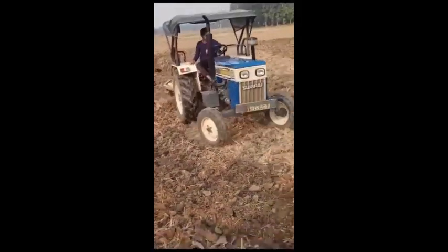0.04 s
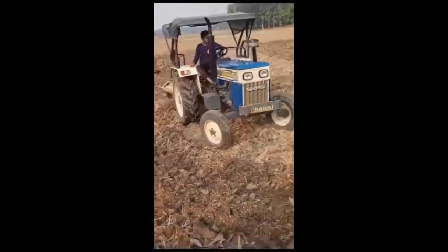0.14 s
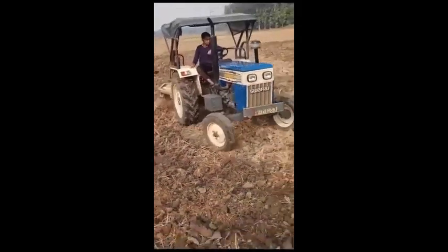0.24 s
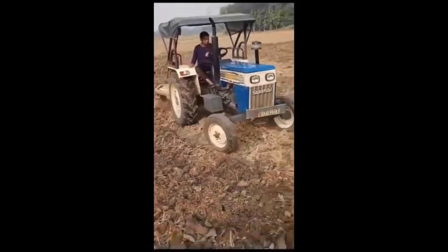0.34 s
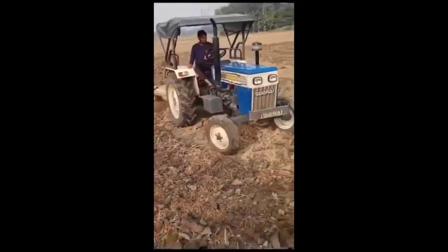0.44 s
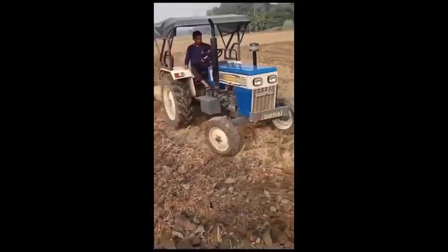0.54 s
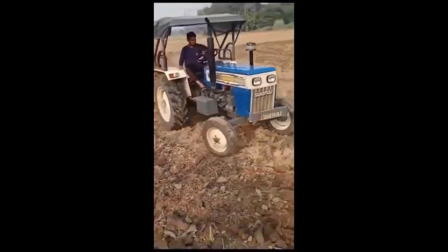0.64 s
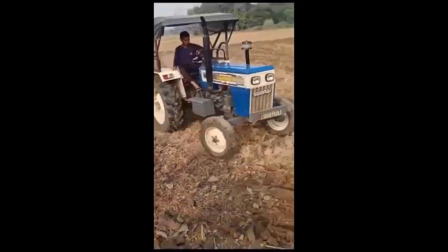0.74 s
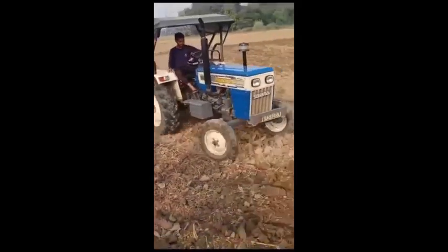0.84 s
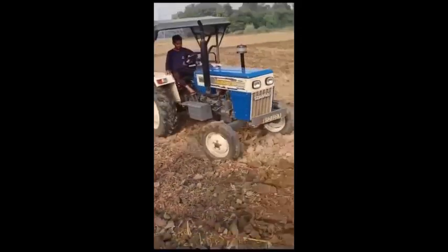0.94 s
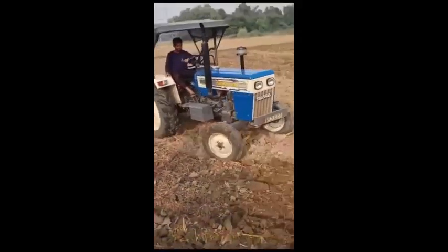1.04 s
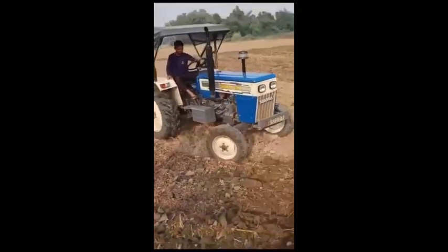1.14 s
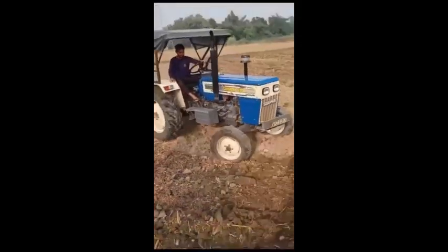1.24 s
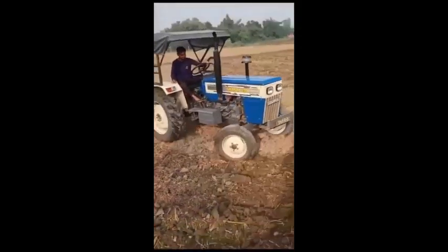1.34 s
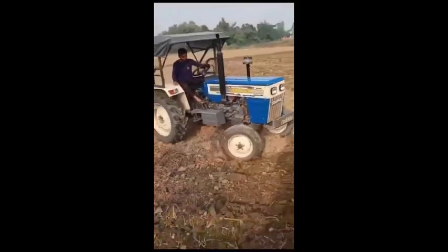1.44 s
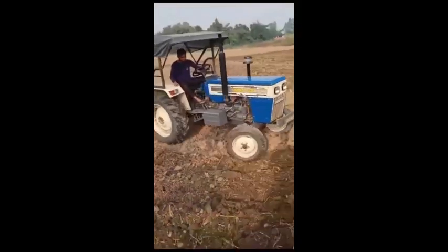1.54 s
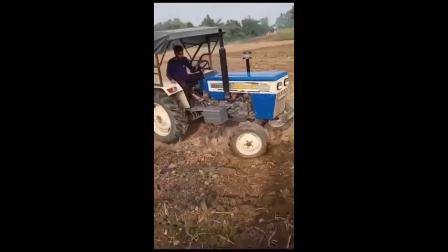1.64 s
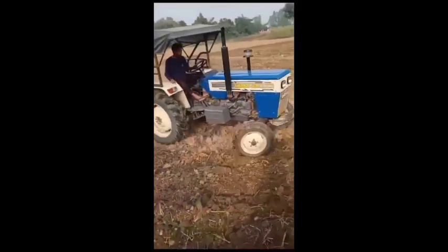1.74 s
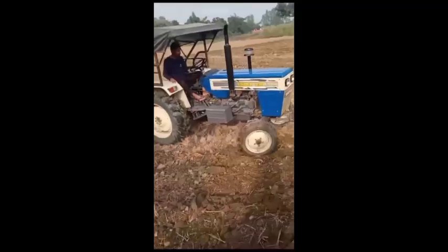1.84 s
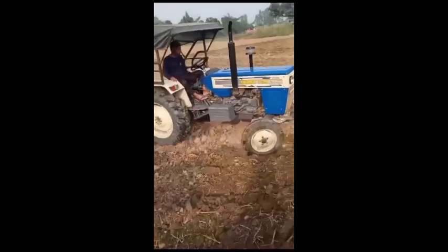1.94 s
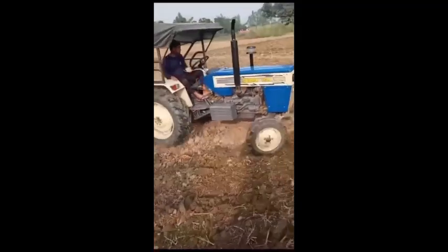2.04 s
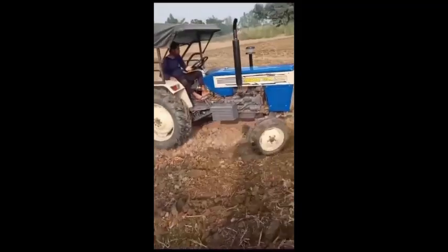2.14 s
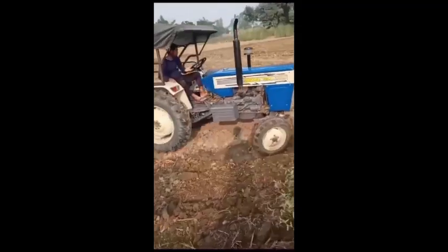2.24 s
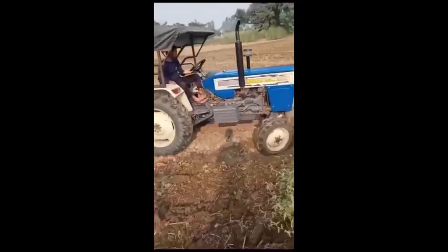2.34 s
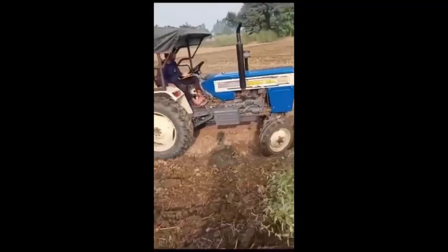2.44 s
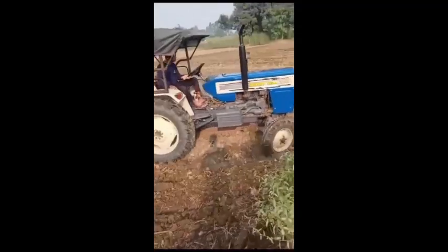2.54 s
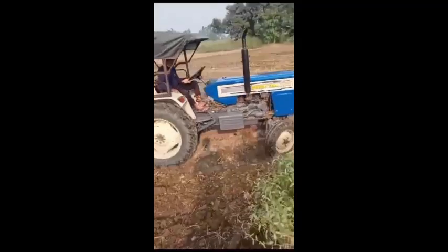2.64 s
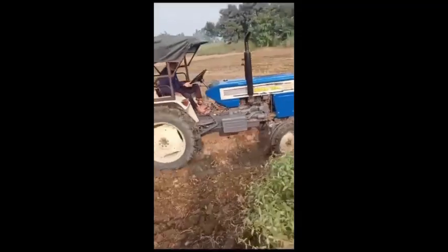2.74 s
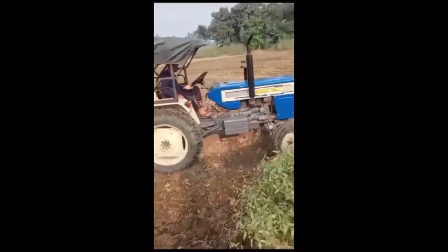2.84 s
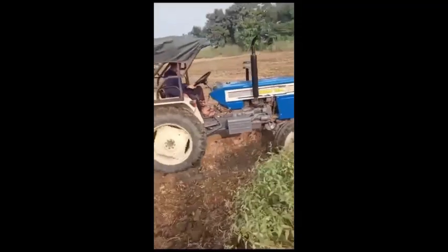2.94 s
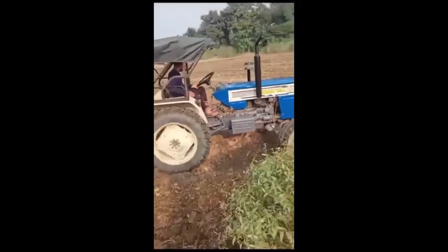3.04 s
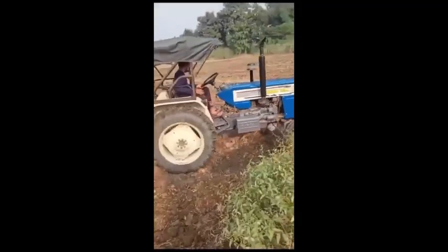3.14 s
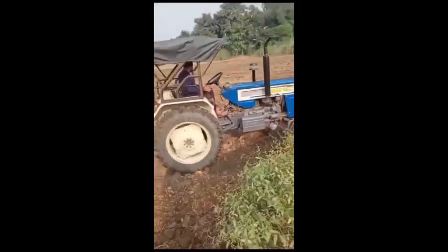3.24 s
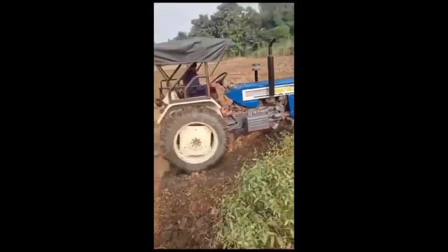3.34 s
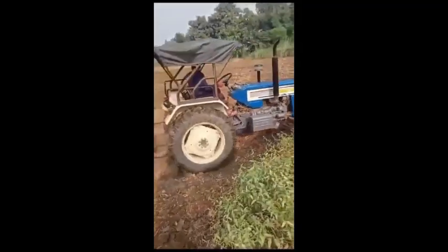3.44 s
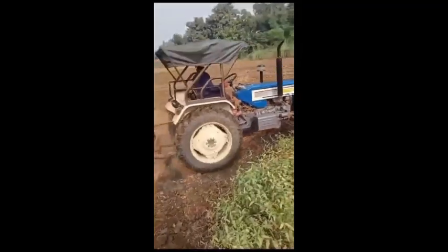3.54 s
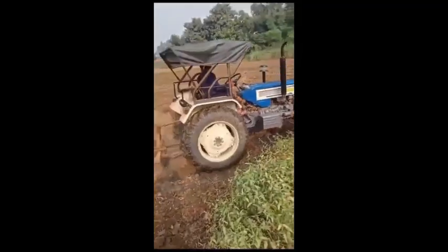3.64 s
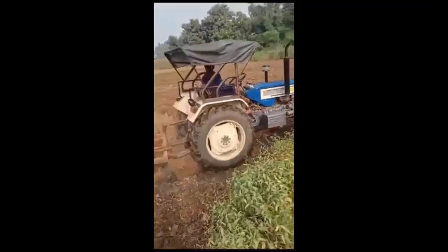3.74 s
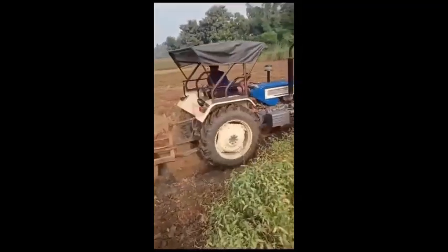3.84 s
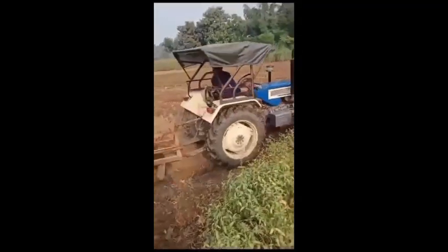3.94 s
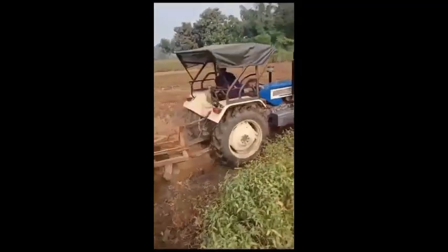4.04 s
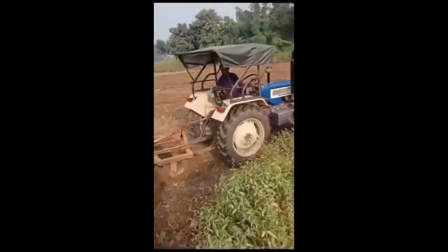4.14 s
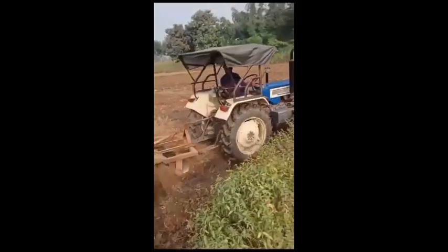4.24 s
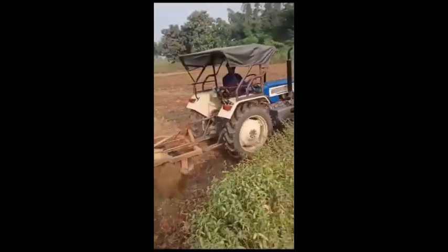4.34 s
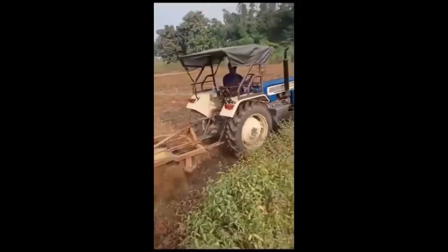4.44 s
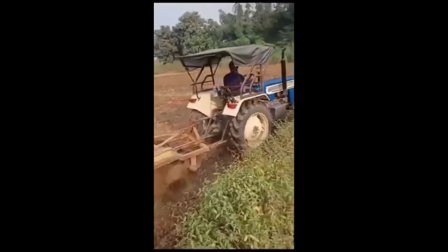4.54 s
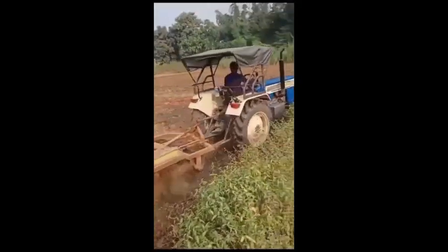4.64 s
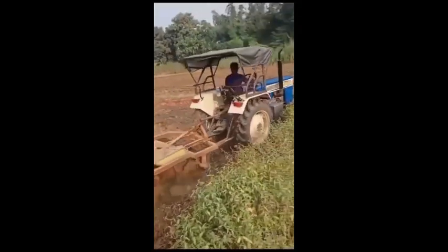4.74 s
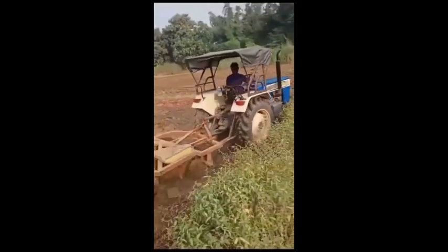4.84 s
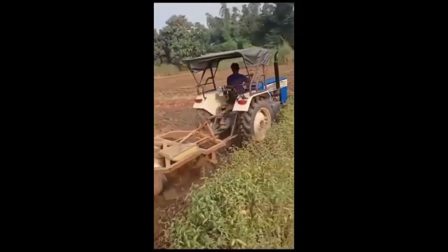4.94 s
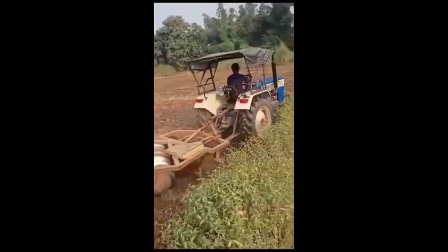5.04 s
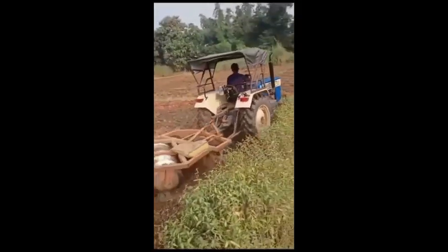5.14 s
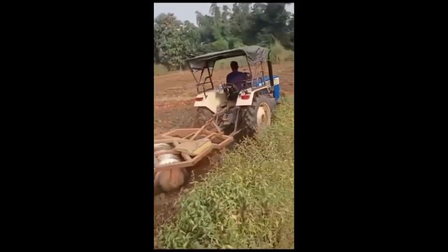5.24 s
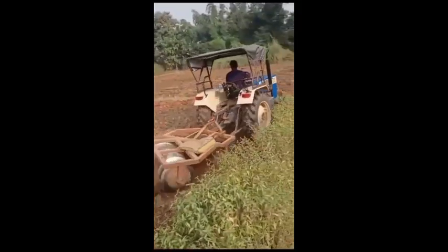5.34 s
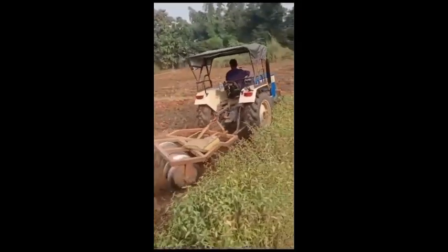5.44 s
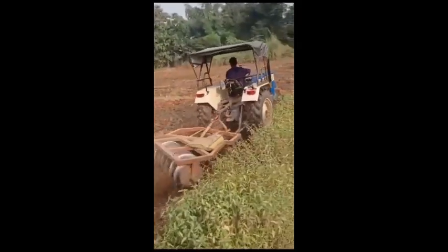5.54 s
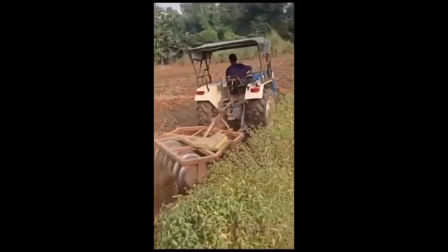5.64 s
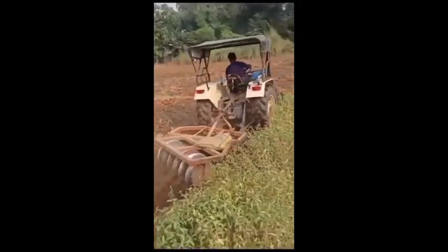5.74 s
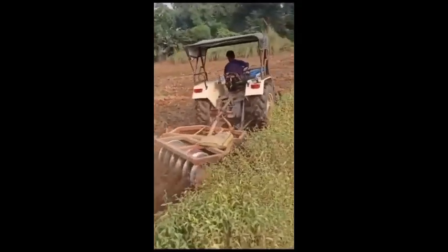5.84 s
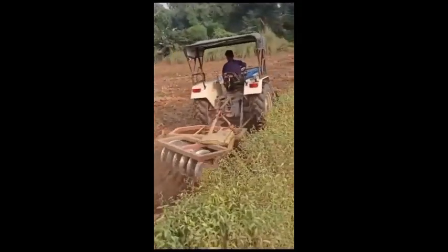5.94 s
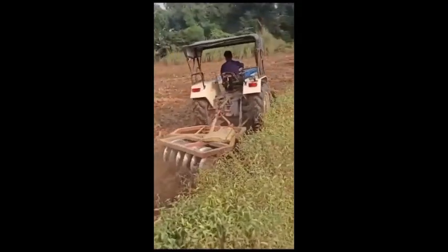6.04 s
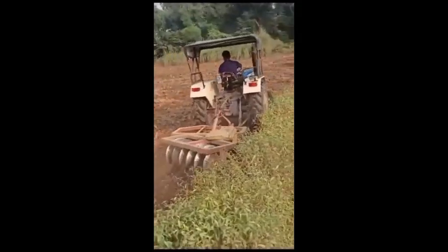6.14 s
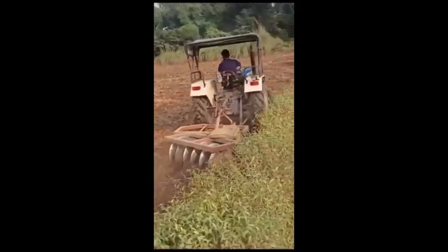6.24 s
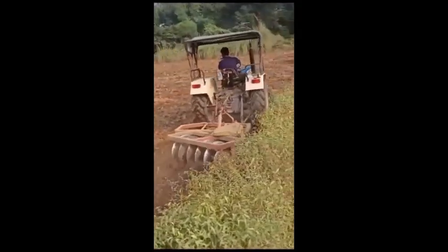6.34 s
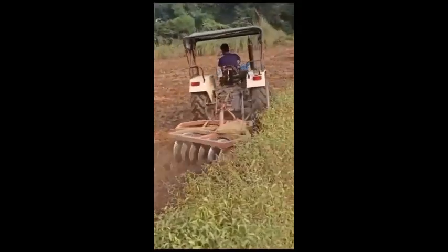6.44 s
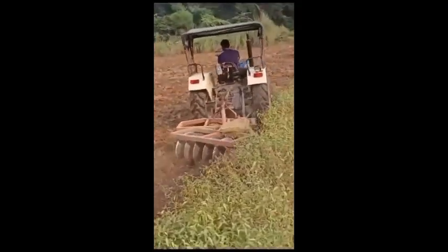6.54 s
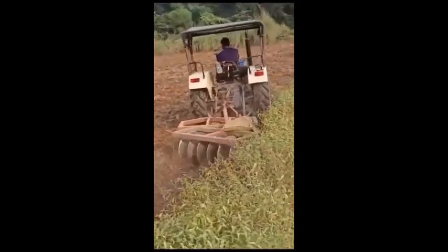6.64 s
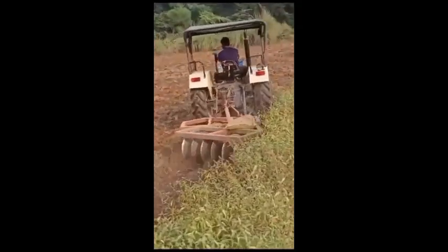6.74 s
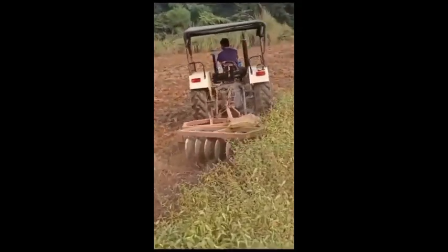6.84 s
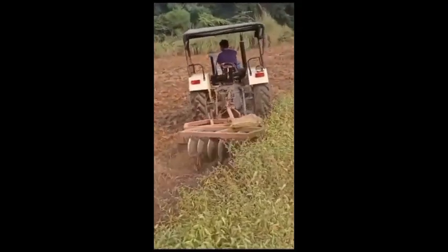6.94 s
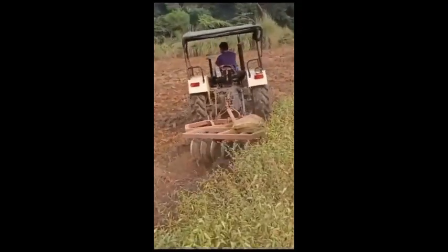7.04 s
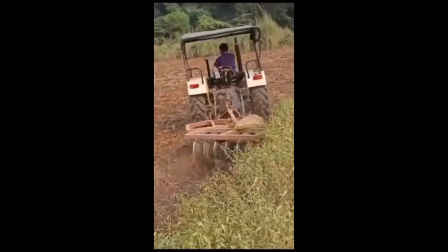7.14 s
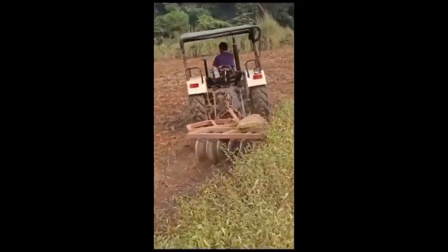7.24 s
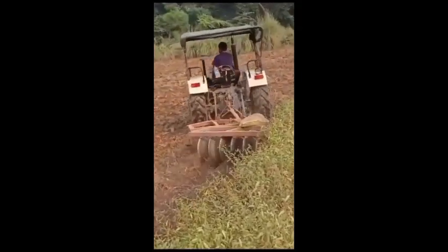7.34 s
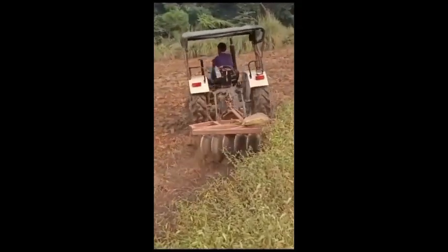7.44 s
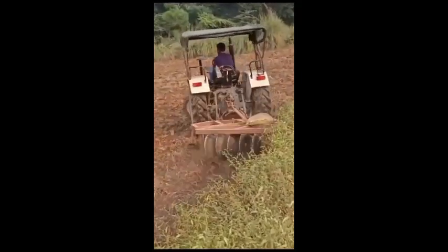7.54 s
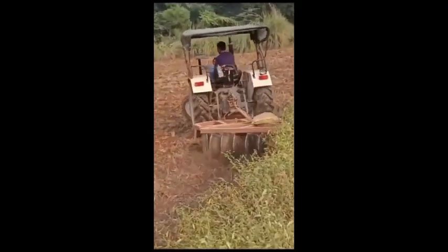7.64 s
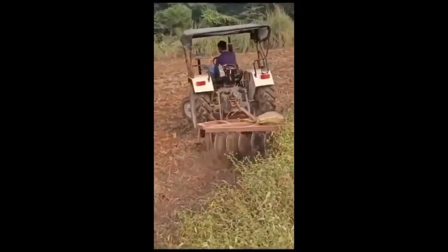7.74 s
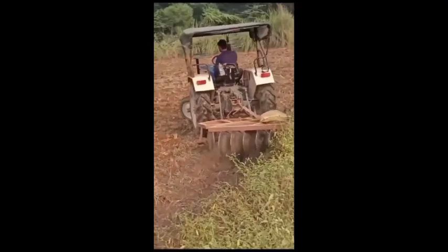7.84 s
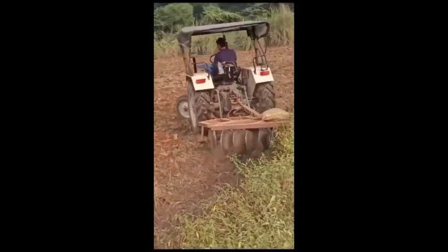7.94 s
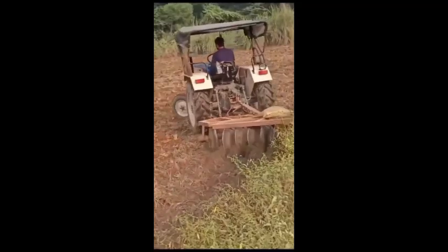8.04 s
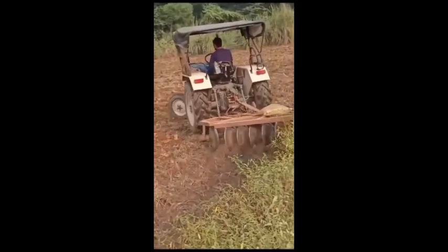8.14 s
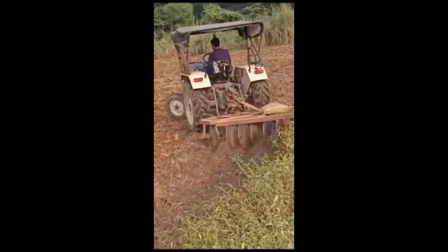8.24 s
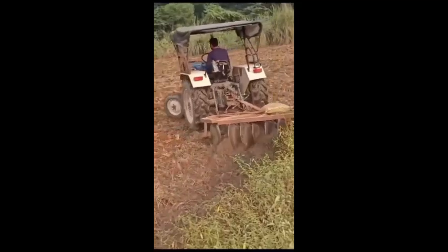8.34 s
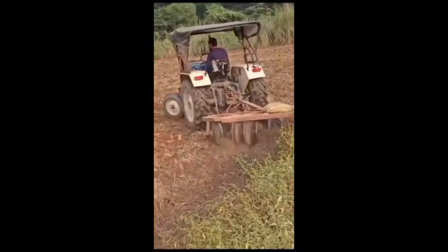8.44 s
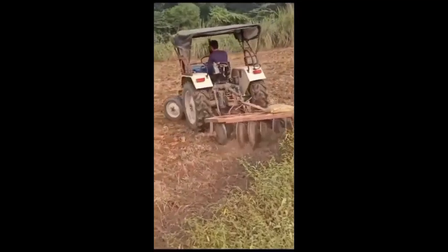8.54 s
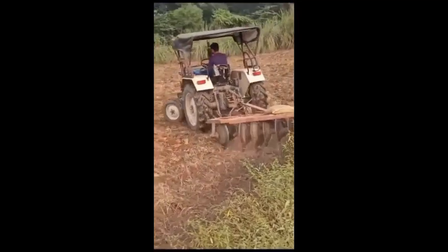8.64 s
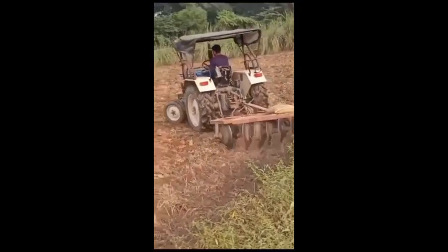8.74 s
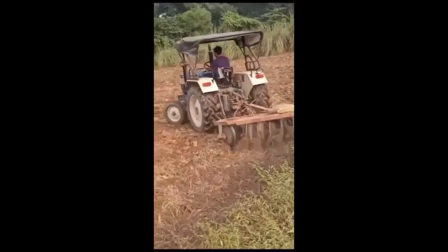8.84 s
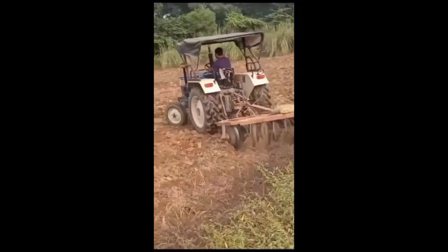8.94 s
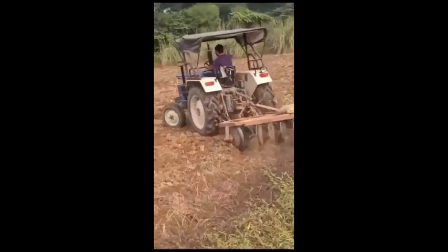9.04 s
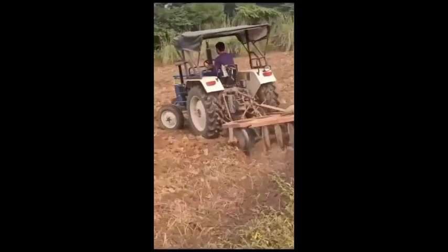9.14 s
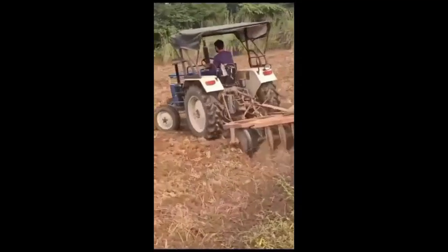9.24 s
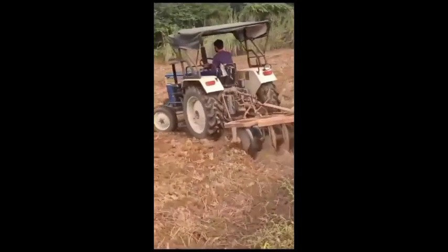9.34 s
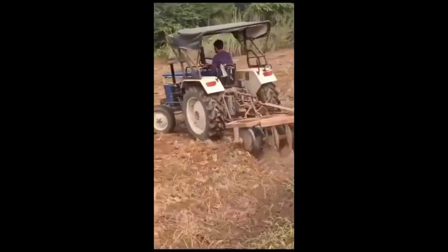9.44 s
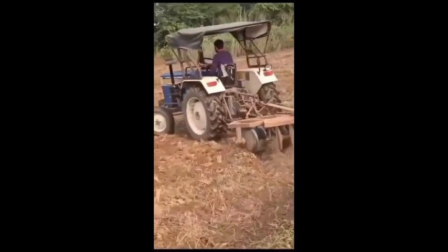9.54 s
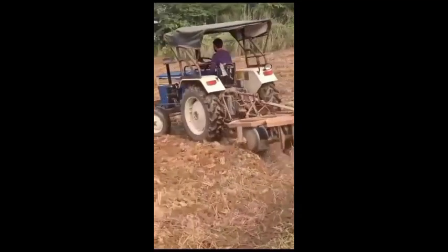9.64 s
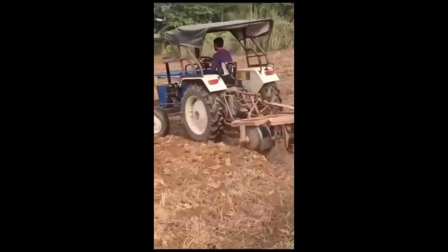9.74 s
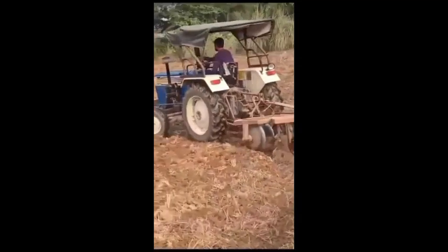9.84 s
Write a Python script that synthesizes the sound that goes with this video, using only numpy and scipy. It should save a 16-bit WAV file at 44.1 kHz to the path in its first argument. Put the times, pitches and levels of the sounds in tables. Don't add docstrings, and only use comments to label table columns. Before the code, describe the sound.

A tractor works in a dry open field, heard dry and close on a phone. From 0 s its diesel runs at a nearly constant speed, about thirty-five firings a second: a hard, barking throb with low thumps, pipe-like ringing from the exhaust, bright knocking and rattling tin. Around 2 to 3 s it turns side-on; a brief bonnet boom colours the note, which then becomes hollower and less raspy. Short, crisp clods clink on the harrow discs at about 2.1, 2.6, 3.6, 4.0, 4.9, 5.1 and 5.5 s. From 5 s the tail faces the microphone, knocks and hiss fall away, and a duller, low beat remains, still with occasional harder barks. A loose panel sings thin and high in wavering snatches from about 6 s. Fainter clinks follow, soil trickles near 7.5 s and faintly after 9 s, as the engine gradually recedes without stopping.

```python
import sys
import numpy as np
from scipy import signal
from scipy.fft import rfft, irfft, next_fast_len
from scipy.io import wavfile
from scipy.ndimage import map_coordinates

SR = 44100
rng = np.random.default_rng(int(sys.argv[2]) if len(sys.argv) > 2 else 0)


def ratio(d):
    e = np.asarray(d, float) / 20
    return 10 ** e


def wav_out(sig):
    wavfile.write(sys.argv[1], SR, np.round(np.clip(np.atleast_2d(sig).T, -1, 1) * 32767).astype(np.int16))


N = 435708

# time_s, side_on (0-1), tail_on (0-1), ground_echo_delay_ms, bonnet_boom_db
POSE = [
    (0, 0, 0.04, 0.72, -45),
    (1.8, 0.12, 0.03, 0.73, -41.5),
    (2.1, 0.2, 0.11, 0.83, -32),
    (2.6, 0.5, 0.31, 1, -32),
    (3, 0.8, .2, 1.035, -40),
    (3.5, 1, 0.5, 1.26, -36.5),
    (4.3, 1, 0.98, 1.35, -41),
    (5.3, .7, 0.95, 1.48, -47),
    (6, 0.28, 0.99, 1.45, -58),
    (9.88, 0.13, 0.98, 1.52, -55),
]


def unit(x):
    return x / np.sqrt(np.mean(x ** 2) + 1e-20)


def curves(rows):
    s, *cols = np.transpose(rows)
    return [np.interp(np.arange(N) / SR, s, c) for c in cols]


def wobble(rate):
    coarse = np.arange(0, N + 64, 64)
    knots = rng.standard_normal(int(N * rate / SR) + 4)
    smooth = map_coordinates(knots, [coarse * rate / SR])
    return np.interp(np.arange(N), coarse, smooth)


def filtered(x, response):
    m = next_fast_len(N + 8192)
    return irfft(rfft(x, m) * response(np.fft.rfftfreq(m, 1 / SR)), m)[:N]


def colour(points):
    f, db = np.transpose(points)
    return lambda hz: ratio(np.interp(np.log(hz + 1), np.log(f), db, -120, -120))


def mode(hz, width):
    return lambda f: 1j * f * width / (hz * hz - f * f + 1j * f * width)


def blend(x, share, first, second):
    share = np.clip(share, 0, 1)
    front = unit(filtered(x, first))
    back = unit(filtered(x[::-1], second)[::-1])
    return np.sqrt(1 - share) * front + np.sqrt(share) * back


def crank():
    # time_s, rate_firings_per_s
    speed = [(0.0, 35.57), (0.25, 34.89), (0.51, 34.39), (0.76, 34.91), (1.01, 34.95), (1.27, 35.06),
             (1.52, 34.91), (1.77, 34.55), (2.03, 34.7), (2.28, 34.59), (2.53, 34.5), (2.79, 34.74),
             (3.04, 34.3), (3.29, 34.32), (3.55, 34.66), (3.8, 34.34), (4.05, 34.75), (4.31, 34.59),
             (4.56, 34.43), (4.81, 34.17), (5.07, 34.35), (5.32, 34.48), (5.57, 34.52), (5.83, 34.57),
             (6.08, 34.38), (6.33, 34.25), (6.59, 34.71), (6.84, 34.56), (7.09, 34.27), (7.35, 34.39),
             (7.6, 34.57), (7.85, 34.04), (8.11, 34.56), (8.36, 34.55), (8.61, 34.09), (8.87, 34.8),
             (9.12, 34.55), (9.37, 34.68), (9.63, 34.91), (9.88, 33.95)]
    start_firings = -.7116
    return start_firings + np.cumsum(curves(speed)[0]) / SR


def firings(turn, lead_s, scatter_db, cylinder_db, hard=()):
    at = np.flatnonzero(np.diff(np.floor(turn)))
    chance = rng.standard_normal((len(at), 2))
    db = scatter_db * np.minimum(chance[:, 0], 1.5) + np.take(cylinder_db, np.arange(len(at)) % 3)
    for s, extra_db in hard:
        db[np.argmin(abs(at - s * SR))] = extra_db
    jitter_s = 0.00051 * chance[:, 1]
    start = np.clip(at - (lead_s + jitter_s) * SR, 0, N - 1).astype(int)
    return np.bincount(start, ratio(db), N)


def puffs(clicks, rise_s, fall_s, steady):
    t = np.arange(SR // 20) / SR
    shape = (1 - np.exp(-t / rise_s)) * np.exp(-t / fall_s)
    bursts = signal.fftconvolve(clicks, shape)[:N]
    envelope = unit(bursts) + steady * ratio(1.47 * wobble(40))
    return unit(envelope * rng.standard_normal(N))


def panel():
    # time_s, level_db
    singing = [(5.4, -56), (6.2, -55), (6.27, -46), (6.43, -55), (7.02, -56), (7.18, -48), (7.41, -57),
               (7.51, -50), (7.75, -66), (7.77, -54), (8.06, -65), (8.22, -56), (8.42, -71), (8.56, -54),
               (8.79, -65), (8.88, -54), (8.94, -71), (9.63, -58), (9.7, -71), (9.88, -56)]
    fade_in = np.clip((np.arange(N) / SR - 4.6) / .8, 0, 1)
    song = unit(filtered(rng.standard_normal(N), mode(3340, 45)))
    return fade_in * ratio(curves(singing)[0] + 5) * song


def discs():
    # start_s, peak_db, ring_hz, ring_share (0-1), t60_s
    clods = [(2.0812, -12, 4070, 0.46, 0.045), (2.577, -9, 4740, 0.57, 0.031),
             (3.557, -13, 7290, 0.3, 0.04), (3.9913, -12, 8010, 0.4, 0.04), (4.8524, -12, 6800, 0.44, 0.04),
             (5.0868, -16, 7320, 0.4, 0.04), (5.462, -10.5, 7370, 0.33, 0.036),
             (5.694, -23, 4900, 0.56, 0.045), (5.9015, -21, 7940, 0.3, 0.04),
             (6.2218, -21.5, 4930, 0.34, 0.049), (6.4128, -28, 6800, 0.5, 0.04),
             (6.546, -26, 7280, 0.6, 0.04), (6.6019, -26, 5920, 0.5, 0.04), (6.8977, -22, 5840, 0.4, 0.052),
             (7.5294, -23, 4900, 0.38, 0.04), (8.0845, -29, 8450, 0.4, 0.04),
             (8.2894, -31, 7360, 0.5, 0.04)]
    # start_s, peak_db, ring_hz, ring_share (0-1), t60_s
    slides = [
        (7.4964, -31, 5390, 0.3, 0.12),
        (7.5118, -25, 5370, 0.3, 0.1),
        (7.5288, -29, 4970, 0.5, 0.12),
        (9.2254, -32, 7300, 0.2, 0.12),
        (9.5896, -31.5, 4100, 0.35, 0.1),
    ]
    # frequency_hz, density_db (per Hz)
    crunch = [(1500, -30), (3000, -20), (5000, -4), (7500, 3), (9500, -4), (12000, -15), (15500, -10)]
    crack, ring = np.zeros(N + SR), np.zeros(N + SR)
    t = np.arange(SR // 5) / SR
    for s, db, hz, share, t60 in clods + slides:
        i = round(s * SR)
        fade = ratio(db - 60 * t / t60) * (1 - np.exp(-t / 0.00053))
        crack[i:][:len(t)] += (1 - share) * fade * rng.standard_normal(len(t))
        ring[i:][:len(t)] += share * fade * np.sin(2 * np.pi * hz * t)
    return ratio(1.0) * filtered(crack[:N], colour(crunch)) + ring[:N]


def block(turn):
    # time_s, knock_db, rattle_db, hiss_db
    levels = [(0.0, -29, -28, -42.0), (0.3, -34, -29.5, -45), (0.6, -27.5, -27, -40.5),
              (0.9, -34.5, -27, -43), (1.2, -31.0, -27.5, -41.0), (1.5, -37.5, -26, -41),
              (1.8, -34, -29, -37), (2.1, -40, -29, -38), (2.4, -33.5, -32, -39), (2.69, -31, -32.5, -40),
              (2.99, -32, -32.5, -39), (3.29, -26.5, -32, -38), (3.59, -36.5, -34, -42.0),
              (3.89, -33, -31, -36.5), (4.19, -37.5, -31.5, -41), (4.49, -39.5, -33, -41),
              (4.79, -39, -32.5, -42.5), (5.09, -39, -34.0, -42), (5.39, -45.5, -35, -46),
              (5.69, -48, -36.5, -50), (5.99, -46, -38, -54), (6.29, -52, -39, -52.0),
              (6.59, -54, -40, -52), (6.89, -58, -39, -54), (7.19, -54, -41.0, -50),
              (7.48, -61, -38.5, -54), (7.78, -55, -42, -55.5), (8.08, -53, -42, -55.5),
              (8.38, -56, -41.5, -57), (8.68, -60, -41.5, -56.5), (8.98, -52, -43, -56.5),
              (9.28, -53, -41.5, -55.5), (9.58, -53, -40.5, -55.5), (9.88, -53, -41, -55.5)]
    # frequency_hz, density_db (per Hz)
    knock_colour = [(700, -18), (1000, -3), (1600, 3), (2400, -2), (3500, -1.5), (5500, -3), (8200, -3),
                    (9500, -12.5), (12000, -37)]
    rattle_front = [(1350, -3), (2300, -3), (2630, -0.5), (3220, 2), (3520, -4.5), (3970, -3.5), (6650, -3),
                    (7990, -4), (9850, -14.5), (10500, -35), (13600, -49), (22000, -120)]
    rattle_tail = [(1350, -7), (2300, -3), (2660, 0.5), (3060, -7), (3300, -5), (4340, -8.5), (4840, -6),
                   (6690, -12), (7400, -3.5), (10500, -17.5), (13600, -44), (22000, -120)]
    hiss_colour = [(8000, 7), (9500, -23), (10500, -8.5), (12200, -8), (14900, -4.5), (15400, -0.5),
                   (15750, -9), (15850, -60)]
    knock_db, rattle_db, hiss_db = curves(levels)
    _, tail, delay_ms, _ = curves(POSE)

    knock = puffs(firings(turn, 0.0019, 1.4, (-.5, 1, -.5)), rise_s=.001, fall_s=0.0049, steady=0)
    rattle = puffs(firings(turn, 0.0082, 2.5, (-.5, 1.5, -.5)), rise_s=.003, fall_s=0.0087, steady=5.7)
    hiss = puffs(firings(turn, 0.0067, 3.1, (-1, 2, -.5)), rise_s=.003, fall_s=0.0041, steady=1.5)
    knock = ratio(knock_db + .5) * unit(filtered(knock, colour(knock_colour)))
    rattle = ratio(rattle_db - 2.0) * blend(rattle, tail, colour(rattle_front), colour(rattle_tail))
    hiss = ratio(hiss_db + 0.5) * unit(filtered(hiss, colour(hiss_colour)))

    bounced = .7 * knock + .35 * rattle
    echo = np.interp(np.arange(N) - delay_ms * SR / 1000, np.arange(N), bounced)
    return knock + rattle + echo + hiss


def stack(turn):
    # time_s, first_mode_db, second_mode_db, third_mode_db, rumble_db
    levels = [(0.0, -33, -25, -29, -23), (0.3, -43, -30, -32.0, -27.5), (0.6, -36, -23, -32.5, -21),
              (0.9, -35.5, -29, -35, -26.5), (1.2, -37, -25.5, -33, -24.0), (1.5, -40, -24.5, -31, -27),
              (1.8, -34, -24, -34, -23.5), (2.1, -33, -27, -26.5, -26.5), (2.4, -29.5, -31.5, -23.5, -32.5),
              (2.69, -26, -36, -27.5, -32), (2.99, -27.5, -36.0, -44, -31), (3.29, -23.5, -30, -33.0, -29),
              (3.59, -28.5, -34.5, -35, -30.5), (3.89, -27, -34.5, -31, -28.5), (4.19, -28, -32, -32, -27),
              (4.49, -30.5, -32.5, -31.5, -26.5), (4.79, -28.5, -31.5, -31, -27.5),
              (5.09, -33, -31, -33.5, -29), (5.39, -30.5, -32, -39, -27.5), (5.69, -31, -32.5, -33, -29),
              (5.99, -29, -35, -35, -29.5), (6.29, -27.5, -35, -37, -31.5), (6.59, -29, -35, -37, -32),
              (6.89, -32, -38.5, -41, -33), (7.19, -29.5, -36, -38.5, -30.5),
              (7.48, -32, -36, -38.5, -32.5), (7.78, -35.5, -38.5, -43, -32.5),
              (8.08, -31, -36.5, -40, -35), (8.38, -39.5, -37.5, -37.5, -33.5),
              (8.68, -34.5, -36.5, -41, -33.5), (8.98, -38, -40, -44.5, -33.5),
              (9.28, -40.5, -39, -41.5, -34), (9.58, -37.5, -39, -40.5, -34), (9.88, -37, -41.5, -47, -36)]
    # frequency_hz, side_on_hz, width_hz, lead_s, scatter_db, steady (share)
    pipe = [(697, 723, 114.5, .007, 1.7, 0.96), (1314, 1392, 129, 0.00078, 2.5, 0.96),
            (1902, 1940, 94, 0.0018, 3, 0.86)]
    # first_cylinder_db, second_cylinder_db, third_cylinder_db
    cylinder = [(-3, 4.5, -4), (-.5, .5, .5), (-1.5, 0, 1)]
    clean = [.62, .6, .58]
    # time_s, second_mode_db, third_mode_db
    barks = [(0.05, 4.5, -3), (0.1, 5.0, -5.0), (0.59, -3, 5), (0.62, -6, 4.0), (0.91, 9, 5),
             (1.17, 5, -2.0), (1.4, 5, -2.0), (1.57, 4, 0.0), (1.74, 4.5, 5), (1.77, -3, 11), (1.8, 0, 6),
             (1.83, 0, 13), (2.17, -1.0, 6.5), (2.69, 7, 7.5), (3.13, 3.0, 11), (3.25, 3.0, 5.0),
             (3.27, -1, 4), (3.91, 10, 3.0), (3.94, 7.0, 2.0), (4.37, -9, 3), (4.46, -5, 6.5),
             (5.13, 3.0, 9), (5.16, -6, 7), (5.42, 1.0, 11), (5.51, -2.0, 6.0), (5.68, -5, 8),
             (6.26, 0.0, 6), (6.55, 0.0, 7), (6.64, 1, 7.0), (6.81, 3, 11), (6.9, 9, 0), (7.07, -1.0, 9),
             (7.1, 2, 6), (7.25, 9.5, 1.0), (7.48, 8, 3.0), (7.92, 7, 2.0), (8.06, -7, 4.0),
             (8.09, -4.0, 9.5), (8.21, -4.0, 6), (8.56, -8.0, 7), (8.65, 3, 3), (8.76, -4.0, 9),
             (8.91, 2.0, 9), (9.34, 7, 5.0), (9.37, -1.0, 6), (9.43, 5.0, 2), (9.6, 0, 8), (9.77, 5, 7)]
    # frequency_hz, density_db (per Hz)
    rumble_front = [(20, -20), (50, -16), (90, -15), (150, -7.5), (250, -3), (400, -3.5), (520, -11.5),
                    (620, -18), (900, -29), (1600, -36)]
    rumble_tail = [(20, -15), (50, -17), (90, -2), (140, -0.5), (250, -5.5), (330, -6.5), (430, -16),
                   (510, 0), (600, -4), (820, 1), (960, -28), (1600, -39)]
    *mode_db, rumble_db = curves(levels)
    side, tail, _, bonnet_db = curves(POSE)

    gas = puffs(firings(turn, 0.0051, 1, (-.5, 1.5, -.5)), rise_s=0.0043, fall_s=0.023, steady=3.4)
    out = ratio(rumble_db - 1.2) * blend(gas, tail, colour(rumble_front), colour(rumble_tail))

    s, second_db, third_db = np.transpose(barks)
    hard = [(), zip(s, second_db), zip(s, third_db)]
    for k, (hz, side_hz, width, lead_s, scatter_db, steady) in enumerate(pipe):
        clicks = firings(turn, lead_s, scatter_db, cylinder[k], hard[k])
        turbulence = puffs(clicks, 0.00066, 0.012, steady)
        gas = clean[k] * unit(clicks) + (1 - clean[k]) * turbulence

        def ring(centre):
            return unit(filtered(gas, lambda f: mode(centre, width)(f) * mode(centre, 2.2 * width)(f)
                                 * mode(centre, 4 * width)(f)))

        out += ratio(mode_db[k] + 0.3) * ((1 - side) * ring(hz) + side * ring(side_hz))
    boom = unit(filtered(gas, lambda f: mode(1030, 330)(f) ** 2))
    return out + ratio(bonnet_db) * boom


def silencer(turn):
    # time_s, order_2_db, order_3_db, orders_4_and_8_db, orders_5_to_7_db, orders_9_to_14_db
    note = [(0.0, -23.5, -19, -48.5, -21.5, -28.5), (0.3, -27, -21.5, -43, -24.5, -31.0),
            (0.6, -24, -19.5, -40, -20.5, -28.5), (0.9, -25, -22.0, -30, -22, -29.5),
            (1.2, -24, -23.5, -31, -23.5, -28), (1.5, -25, -22.5, -28, -22.5, -25),
            (1.8, -24.0, -23, -30.5, -22.5, -25), (2.1, -24.5, -22.5, -30, -22.5, -27.5),
            (2.4, -25.5, -22.5, -35, -24.0, -31.5), (2.69, -26.5, -22.5, -33, -26, -30.5),
            (2.99, -26.0, -21.5, -34, -26.0, -47), (3.29, -24, -19.5, -28, -25, -48),
            (3.59, -25.0, -23.5, -35.5, -28.5, -43), (3.89, -23.0, -22, -36, -27, -33),
            (4.19, -23.0, -19, -39.0, -28.5, -46), (4.49, -25, -20.5, -36, -32.5, -46),
            (4.79, -25, -19.5, -35, -34.0, -38), (5.09, -24, -21, -31.5, -31, -41),
            (5.39, -27, -21.0, -35, -37.5, -47), (5.69, -27.5, -21.5, -40, -33, -52),
            (5.99, -28, -21.5, -34, -33.5, -53), (6.29, -25.5, -23, -39, -33, -51),
            (6.59, -27, -23.0, -40, -39, -51.5), (6.89, -28, -23.0, -38.0, -39.0, -52),
            (7.19, -29.0, -24.0, -36.5, -41, -48.5), (7.48, -30, -24.5, -35.5, -42, -47),
            (7.78, -29, -24.0, -40, -42, -50), (8.08, -27.5, -24.0, -38.0, -38.5, -51.0),
            (8.38, -28, -25.5, -42, -46, -50.5), (8.68, -29.0, -25.5, -37, -46, -45),
            (8.98, -28.5, -25.0, -47, -52, -44), (9.28, -29, -25.5, -41, -45, -47),
            (9.58, -31, -25, -46, -50, -47), (9.88, -31.0, -26.0, -41.5, -53, -46)]
    # order, share_db
    middle_orders = [(5, -4.5), (6, -3.5), (7, -6.5)]
    upper_orders = [(9, -4.5), (10, -5.5), (11, -2.5), (12, -13), (13, -10.5), (14, -12)]
    second_db, third_db, fourth_db, middle_db, upper_db = curves(note)
    side, tail, *_ = curves(POSE)
    angle = 2 * np.pi * turn
    ahead_rad = 2.7 - 1.1 * np.clip(3 * side + tail, 0, 1)

    def tone(k, db, lead_rad):
        return ratio(db + 1.5 * wobble(4)) * np.cos(k * angle + lead_rad + .04 * k * wobble(5))

    first = ratio(third_db - 36.5) * np.cos(angle)
    second = ratio(second_db + 0.36 * wobble(12)) * np.cos(2 * angle)
    third = ratio(third_db + .3 * wobble(12)) * np.cos(3 * angle)
    even = ratio(fourth_db) * (tone(4, -0.38, -1.2) + tone(8, -5.5, 0))
    middle = ratio(middle_db) * sum(tone(k, db, ahead_rad) for k, db in middle_orders)
    upper = ratio(upper_db) * sum(tone(k, db, -1.98) for k, db in upper_orders)
    return np.sqrt(2) * (first + second + third + even + middle + upper)


def scene():
    turn = crank()
    return (panel() + discs() + block(turn) + stack(turn) + silencer(turn))[None]


def roll_off(x):
    return signal.sosfilt(signal.butter(12, 16840, fs=SR, output="sos"), x)


def record(dry):
    return roll_off(dry)


dry = scene()
out = record(dry)
wav_out(out)
```